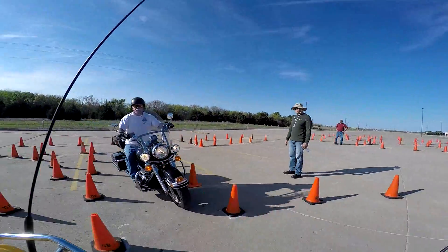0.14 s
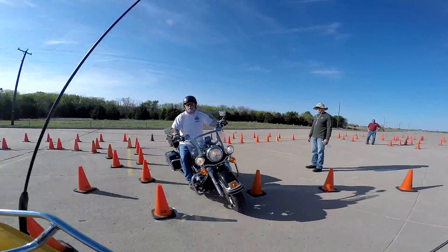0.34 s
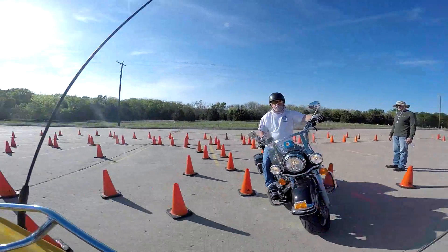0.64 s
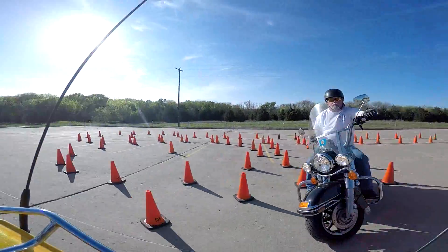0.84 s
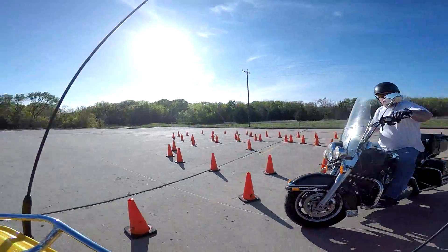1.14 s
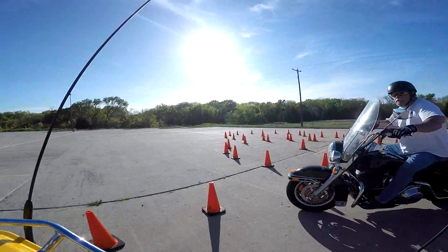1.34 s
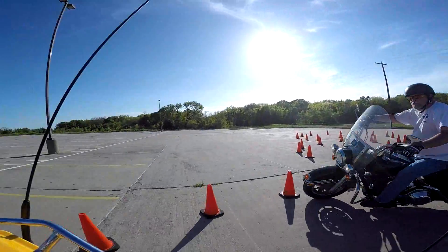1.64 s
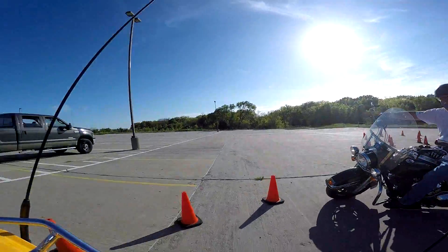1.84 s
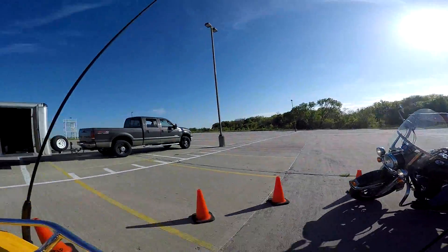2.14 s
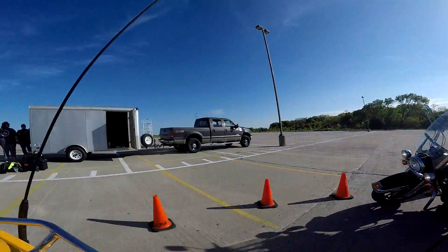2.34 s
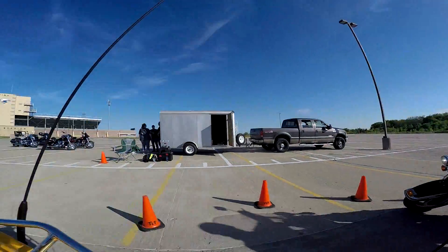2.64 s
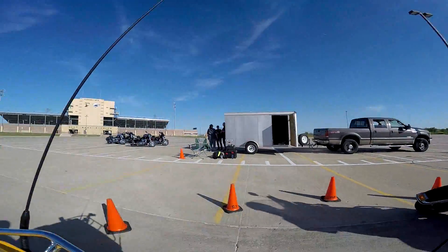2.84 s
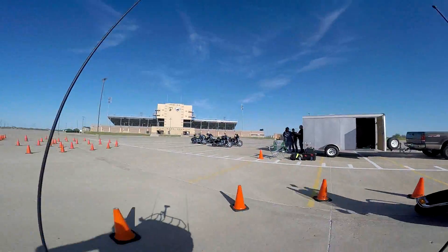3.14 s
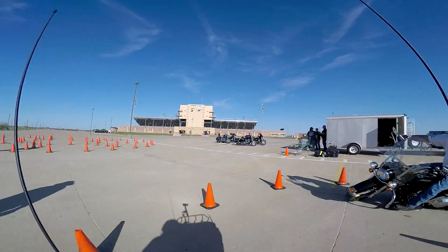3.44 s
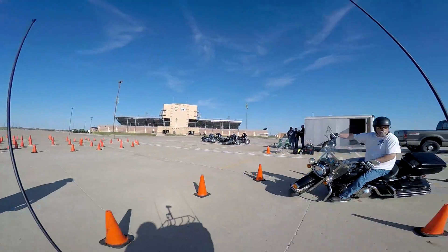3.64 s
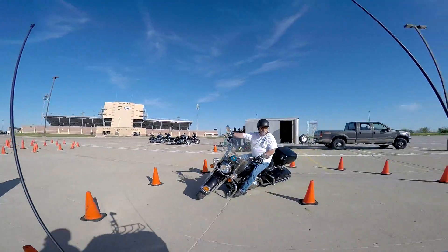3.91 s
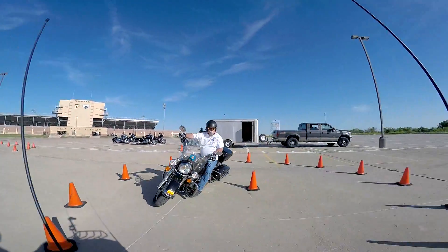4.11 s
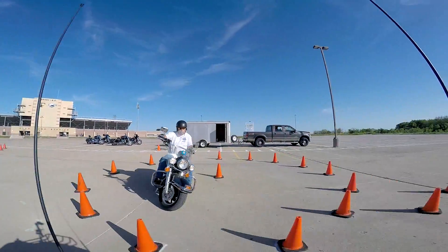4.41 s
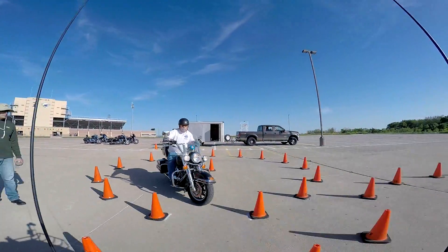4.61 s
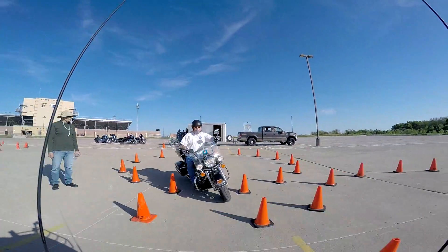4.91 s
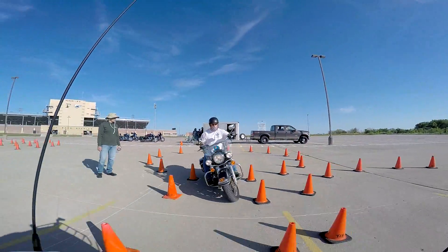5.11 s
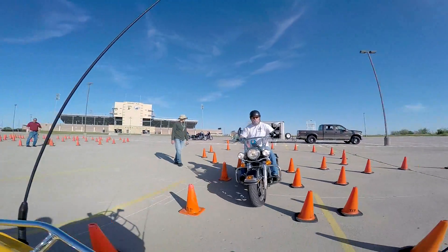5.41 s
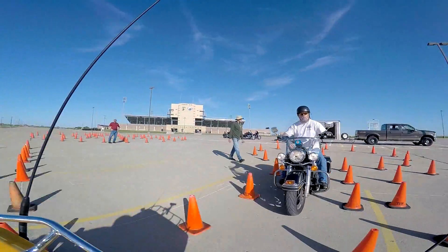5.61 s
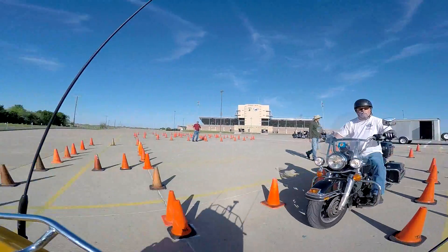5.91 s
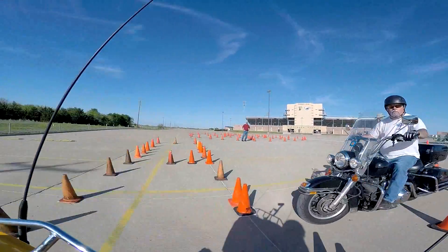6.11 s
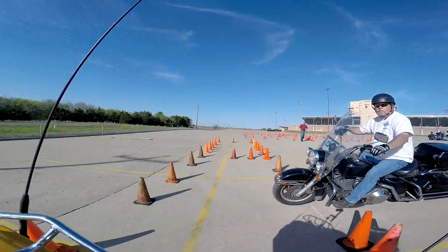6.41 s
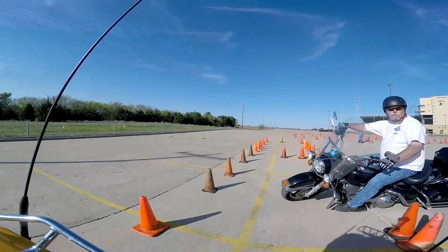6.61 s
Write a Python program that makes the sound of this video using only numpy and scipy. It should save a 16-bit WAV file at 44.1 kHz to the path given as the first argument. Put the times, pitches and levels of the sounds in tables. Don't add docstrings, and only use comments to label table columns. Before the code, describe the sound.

From the start a deep, muffled V-twin drone dominates, about sixteen to nineteen throbs a second with light valve ticks, over a closer engine's uneven bark, knocking cases and bright clatter. The drone quickens and turns throatier around 1 second, then slows and recedes by 2. The near engine climbs from 1.3, with a faint gear whine, and its throttle snaps open at 1.8 to 2.05 with raw, raspy gas bursts; a thin air hiss runs until about 2.75. It settles by 3 into slower puffing, chirping ports and dense metallic ticking as the drone returns. Rough knocks come at 3.5 and 3.9, then cluster at 4.4 to 5 as firing stumbles and a stronger wind gust buffets. After 5.3 the other engine surges again, easing gradually while both rumble on until an abrupt end at about 6.75. Open, dry outdoor lot; microphone on the near motorcycle.

```python
import sys
import numpy as np
from scipy import signal
from scipy.fft import rfft, irfft, next_fast_len
from scipy.io import wavfile
from scipy.ndimage import uniform_filter1d

SR = 44100
rng = np.random.default_rng(int(sys.argv[2]) if len(sys.argv) > 2 else 0)


def voltage_ratio(level):
    return 10 ** (np.asarray(level, float) / 20)


def materialize(psi):
    bounded = np.clip(np.atleast_2d(psi).T, -1, 1)
    quanta = np.round(bounded * 32767).astype(np.int16)
    wavfile.write(sys.argv[1], SR, quanta)


N = 297675
T = np.arange(N) / SR

# centre_s, half_length_s, level_db
GUSTS = [
    (0, .45, -34.5),
    (2.05, .7, -36),
    (3.6, .4, -35.5),
    (4.8, .45, -30.5),
    (6.45, .3, -38),
]
# freq_hz, density_db
WIND_COLOUR = [(14, -20), (28, -5), (50, 0), (90, -5), (160, -13), (280, -22), (500, -38)]
# time_s, level_db
HISS_LEVEL = [
    (1.8, -83),
    (1.86, -44.5),
    (2.4, -45.5),
    (2.72, -42),
    (2.78, -61),
    (2.85, -84),
]
# freq_hz, density_db
HISS_COLOUR = [(800, -24), (2500, -7), (6000, -3), (14000, 4.5), (16000, -5)]

# time_s, rate_cycles_per_s, level_db
OTHER_ENGINE = [(0.0, 16.154, -14.2), (0.425, 16.639, -14.3), (0.825, 18.665, -13.2),
                (1.225, 19.296, -14.6), (1.575, 15.305, -15.8), (1.875, 13.405, -17.9),
                (2.325, 12.419, -18.8), (3.325, 12.446, -17.4), (3.525, 12.912, -15.0),
                (4.25, 14.482, -16.0), (4.375, 15.975, -16.0), (4.475, 16.512, -17.4), (5.0, 12.495, -16.3),
                (5.35, 17.571, -13.5), (5.5, 18.747, -14.0), (5.875, 17.91, -14.4), (6.05, 18.011, -14.0),
                (6.75, 15.654, -15.6)]
# swings_per_cycle, rise_cycles, decay_cycles, level_db, sign
OTHER_WAVE = [(5.13, .1, .25, 0, -1), (6.83, .1, .28, -9.5, -1), (12.6, .05, .2, -23, 1)]
# time_s, level_db
TICK_LEVEL = [(0, -34.5), (.6, -32), (1.2, -30.5), (1.6, -62), (3.4, -36.5), (5.1, -40), (5.45, -34),
              (6.1, -33), (6.75, -39)]
# time_s, level_db
HEADER_LEVEL = [
    (.45, -86),
    (.7, -41),
    (1, -30.5),
    (1.25, -44),
]
# time_s, near_db, other_db
SCATTER = [(0, .7, .6), (1.3, 1.2, .6), (2, 1.7, .8), (2.6, 1.2, .8), (4.2, .8, .8), (4.45, 1.6, 1.8),
           (5, 1.6, 1.8), (5.3, .7, .6), (6.75, .7, .6)]

# start_s, level_db, pitch_hz
FRAME_KNOCKS = [(1.158, -13, 355), (3.465, -11, 350), (3.916, -14, 301), (4.128, -14, 348),
                (4.867, -26, 466), (5.733, -14, 301), (4.379, -8.5, 310), (4.431, -7.5, 306),
                (4.469, -27, 346), (4.619, -12, 377), (4.994, -11.5, 400), (4.54, -14, 500),
                (5.018, -9, 348)]
# time_s, level_db
WHINE_LEVEL = [(1.25, -75), (1.33, -51), (1.55, -48), (1.62, -47), (1.78, -46), (1.85, -75)]
# start_s, level_db, pitch_hz
CASE_KNOCKS = [(0.021, -22, 452), (0.146, -20, 579), (0.182, -21, 519), (0.303, -20, 598),
               (0.329, -21, 479), (0.362, -21, 528), (0.416, -24, 530), (0.472, -24, 495),
               (0.566, -18, 576), (0.655, -22, 525), (0.734, -20, 619), (0.788, -21, 603), (0.82, -21, 549),
               (0.882, -23, 565), (0.926, -21, 560), (0.989, -21, 643), (1.136, -22, 565),
               (1.359, -21, 544), (1.419, -19, 616), (1.729, -21, 401), (1.761, -20, 700),
               (1.798, -21, 616), (1.876, -18, 460), (2.136, -26, 458), (2.501, -22, 412),
               (2.743, -19, 409), (2.888, -24, 436), (3.465, -19, 447), (3.619, -22, 633),
               (3.646, -22, 466), (3.917, -21, 557), (4.131, -20, 568), (4.334, -22, 592), (4.38, -17, 420),
               (4.432, -22, 415), (4.467, -19, 684), (4.586, -22, 608), (4.825, -22, 501),
               (4.903, -27, 476), (4.963, -24, 525), (4.995, -21, 420), (5.406, -21, 420),
               (5.481, -22, 589), (5.504, -23, 589), (5.556, -23, 525), (5.583, -20, 611),
               (5.732, -19, 576), (5.83, -20, 571), (5.878, -22, 654), (6.054, -24, 568), (6.116, -23, 557),
               (6.176, -22, 638), (6.282, -23, 627), (6.339, -22, 560), (6.518, -24, 530)]
# start_s, level_db, pitch_hz
CLANKS = [(0.0807, -29, 3000), (0.3042, -29, 3780), (0.4174, -24.5, 3230), (0.4419, -27, 3070),
          (0.5277, -29, 3740), (0.5821, -24, 3660), (0.7442, -27, 3670), (0.7981, -19.5, 3210),
          (0.851, -25, 3700), (0.9033, -24.5, 3580), (1.2775, -26, 2740), (1.8083, -22, 2800),
          (1.8492, -22, 2680), (1.8876, -19, 2570), (2.6574, -28, 4240), (2.7077, -30, 3120),
          (2.809, -27, 2940), (2.8604, -27.5, 2900), (2.8938, -22, 3400), (2.9467, -26, 3000),
          (2.9652, -30, 2910), (3.019, -24, 2880), (3.0729, -32.5, 3100), (3.1033, -35, 3250),
          (3.1258, -30, 2700), (3.234, -25, 2850), (3.2655, -30, 3100), (3.3428, -36, 2830),
          (3.3982, -29, 2960), (3.4521, -33, 3900), (3.5079, -25, 3930), (3.5618, -34, 3860),
          (3.6182, -30, 3150), (3.7269, -32, 3040), (3.9948, -36, 2980), (4.9626, -30, 3100),
          (5.0823, -28, 3340), (5.1088, -29, 3720), (5.1432, -31, 4980), (5.1696, -30, 4800),
          (5.2036, -25, 3210), (5.2614, -28, 3530), (5.2869, -32, 3300), (5.3178, -29, 2480),
          (5.4281, -28, 3950)]
# start_s, level_db, pitch_hz
MORE_CLANKS = [(.386, -31, 3130), (.552, -36, 3060), (.661, -29, 3480), (.690, -30, 3180),
               (.927, -32, 3360), (1.949, -28, 4070), (2.037, -34, 4200), (2.947, -26, 4840),
               (2.968, -30, 5600), (3.021, -33, 5500), (3.236, -28.5, 4640), (3.268, -30, 4430),
               (3.345, -36, 6350)]

# start_s, level_db, pitch_hz
PORT_NOTES = [(0.3057, -27, 1520), (0.3885, -25, 1230), (1.1358, -26, 972), (1.3259, -23, 907),
              (1.3533, -25, 1010), (1.5539, -23, 980), (1.6217, -22, 1300), (1.8068, -19, 991),
              (1.8322, -18, 926), (1.9245, -17, 1040), (1.9584, -16, 1120), (1.9964, -18, 912),
              (2.2164, -19, 1180), (2.2593, -23, 1030), (2.3835, -22, 985), (2.4244, -24, 1040),
              (2.5127, -24, 1130), (2.5596, -23, 1280), (2.6075, -24, 1120), (2.6559, -26, 1270),
              (2.7072, -21, 1480), (2.7876, -24, 1080), (2.8594, -19, 1120), (2.9113, -23, 1160),
              (2.9672, -17, 1460), (3.018, -19, 1220), (3.0714, -20, 1210), (3.2326, -24, 1450),
              (3.2864, -23, 974), (3.3423, -24, 1470), (3.3992, -23, 1070), (3.4506, -25, 1220),
              (3.5059, -25, 1240), (3.5608, -24, 1220), (3.6147, -24, 1210), (3.6701, -25, 1210),
              (3.7249, -22, 1490), (3.7788, -22, 904), (3.8327, -23, 1250), (3.8871, -21, 1190),
              (3.9404, -22, 1450), (4.1006, -23, 1230), (4.1525, -22, 1650), (4.1829, -26, 1380),
              (4.2552, -23, 1460), (4.3051, -24, 1450), (4.3555, -25, 1490), (4.3804, -22, 902),
              (4.9636, -25, 969), (5.0828, -26, 1370), (5.1432, -26, 1210), (5.2036, -26, 1240),
              (6.0881, -27, 961), (6.6757, -23, 1240), (6.7286, -25, 1030)]
# start_s, level_db
SPITS = [(0.0223, -39), (0.0468, -41), (0.0802, -35), (0.1062, -39), (0.163, -39), (0.1855, -42),
         (0.3057, -42), (0.3616, -45), (0.4204, -39), (0.4728, -38), (0.7397, -40), (0.7687, -40),
         (0.847, -40), (0.8779, -42), (0.9293, -42), (1.0326, -45), (1.0615, -40), (1.0894, -43),
         (1.1134, -43), (1.2595, -39), (1.281, -37), (1.3089, -38), (2.9153, -39), (2.9467, -36),
         (2.9672, -42), (3.019, -41), (3.0729, -40), (3.1253, -42), (3.1797, -43), (3.2345, -43),
         (3.3428, -41), (3.3742, -43), (3.3992, -41), (3.5074, -40), (3.5618, -43), (3.6177, -39),
         (3.6726, -38), (3.7264, -41), (3.8342, -41), (3.8711, -40), (3.8886, -42), (3.9953, -39),
         (4.0477, -40), (4.0991, -38), (4.4084, -42), (4.5101, -42), (4.9626, -45), (5.1437, -41),
         (5.66, -39), (5.7084, -43), (5.7568, -42), (5.7877, -41), (6.3884, -39), (6.5196, -41),
         (6.6807, -42)]
# freq_hz, density_db
SPIT_COLOUR = [(5000, -20), (7000, 0), (10000, -2), (13000, -9), (15600, -16)]
# start_s, level_db
POPS = [(1.7898, -23), (1.8078, -17), (1.85, -16), (1.8876, -18), (1.9285, -14.5), (1.96, -16)]
# freq_hz, density_db
POP_COLOUR = [(500, -22), (800, 8), (1800, -1), (3300, -11), (4500, -16), (6000, -30)]

# time_s, flow_db, valve_crack_db, pipe_facing_db
GAS = [(0, -2, 6.5, 1), (.3, -2, 4.5, -1.5), (.65, 1, 5.5, -1), (1.05, -1, 2, -2), (1.3, 2, 5.5, -2.5),
       (1.55, 5, 0, -2.5), (1.9, 2.5, 3.5, -1), (2.35, 3, 2, 1.5), (2.6, 1, 4, 2), (3.0, 0.5, 7.5, -4.5),
       (3.6, -1.5, 5, -2), (4.1, -0.5, 7, -0.5), (4.4, 1, 5.5, -3.5), (4.75, -6, 3, -2.5),
       (5.2, -0.5, 7, -2.5), (5.55, -1, 4, -3), (6.0, 0.5, 2, -1.5), (6.75, 2, 5, -1)]
# time_s, extra_gas_db
BLIP = [
    (1.78, 0),
    (1.8, 3),
    (2.03, 3),
    (2.08, 0.5),
]
# freq_hz, density_db
THROAT_COLOUR = [(250, 10), (330, 8), (420, 4.5), (500, 3), (600, 1), (750, -2.5), (900, -8.5), (1150, -39)]
MIDDLE_COLOUR = [(750, -1.5), (950, 0), (1250, -1.5), (1900, -9), (2400, -31)]
JET_COLOUR = [(1700, -1.5), (2100, 1), (3100, -1.5), (5000, -4.5), (6500, -9), (7800, -23)]
TOP_COLOUR = [(5800, -23), (7000, -0.5), (9000, -5.5), (12000, -12), (15500, -19.5)]
# start_s, length_s, chirp_db
WHISTLES = [(1.3, .9, 4.5), (2.196, 0.16, 12), (2.54, 1.9, 13), (2.862, 0.2, 17), (3.24, 0.13, 14.5),
            (3.717, .22, 14.5), (4.25, .1, 13.5), (5.144, 0.08, 8.5), (5.8, 0.12, 10.5), (6.68, .06, 7)]
CHIRP_HZ = (1200, 1465, 2340, 2910)

# time_s, rate_cycles_per_s, level_db
NEAR_ENGINE = [(0.0, 17.526, -27.0), (0.25, 17.575, -25.8), (0.85, 18.838, -26.7), (1.375, 21.081, -21.1),
               (1.625, 23.615, -21.1), (1.775, 23.857, -19.2), (2.025, 27.98, -18.8),
               (2.325, 24.824, -20.8), (2.6, 20.501, -20.3), (2.95, 18.876, -20.4), (3.425, 18.161, -21.8),
               (3.85, 18.526, -22.4), (4.575, 20.25, -24.3), (4.925, 17.307, -23), (5.1, 16.288, -25.3),
               (5.7, 20.401, -24.4), (5.95, 21.126, -23.1), (6.75, 18.651, -22.7)]
# swings_per_cycle, decay_cycles, level_db, sign
NEAR_WAVE = [(8.9, .14, 0, 1), (3.8, .22, 4.7, -1), (12.1, .24, -10, 1)]
# pitch_hz, width_hz, level_db
NEAR_PIPE = [(174.2, 9.4, -13.5), (245.6, 7.6, -23.5), (352.2, 27, -22)]
# time_s, valve_rise_cycles, bite_db, bite_swings_per_cycle, front_early_cycles, rear_early_cycles
LOAD = [(0, .01, -20.5, 22, 0.0033, -0.0067), (1.35, 0.0088, -16, 14.5, 0.014, 0.017),
        (1.7, 0.012, -8, 15.6, 0.012, 0.024), (2.0, 0.022, -12.5, 14.2, 0.016, 0.029),
        (2.55, 0.031, -12, 15.4, 0.0082, .02), (2.75, 0.0033, -16, 20, 0.0012, -0.001),
        (4.3, 0.0045, -24, 19, 0.0015, -0.001), (5.0, 0.0091, -25, 18.8, .004, 0.0017),
        (5.7, .018, -22, 15.2, 0.0076, 0.0064), (6.75, 0.011, -16, 18, 0.0078, 0.0053)]


def curves(table):
    time_s, *columns = np.transpose(table)
    return [np.interp(T, time_s, column) for column in columns]


def unit(x):
    return x / np.sqrt(np.mean(x ** 2))


def noise(colour):
    hz, db = np.transpose(colour)
    size = next_fast_len(N)
    log_hz = np.log(np.maximum(np.arange(size // 2 + 1), 1) * SR / size)
    gain = voltage_ratio(np.interp(log_hz, np.log(hz), db, left=-90, right=-90))
    return unit(irfft(rfft(rng.standard_normal(size)) * gain, size)[:N])


def ring(x, hz, width_hz):
    return signal.lfilter(*signal.iirpeak(hz, hz / width_hz, fs=SR), x)


def walk(rate_hz):
    hold = int(SR / rate_hz)
    steps = np.repeat(rng.standard_normal(N // hold + 1), hold)
    return 1.2 * uniform_filter1d(steps, hold)[:N]


def strokes(rate_hz, places, slip_cycles=.002):
    crank = np.cumsum(rate_hz) / SR
    for place in places:
        chance = np.clip(rng.standard_normal((400, 4)), -1.6, 1.6)
        turn = np.floor(crank - place).astype(int) + 1
        late = slip_cycles * np.abs(chance[turn, 0])
        yield np.maximum(crank - place - turn + 1 - late, 0), chance[turn, 1:].T


def swell(angle, rise, decay):
    return (1 - np.exp(-angle / rise)) * np.exp(-angle / decay) * np.minimum(10 * (1 - angle), 1)


def blow(angle, waves):
    return sum(sign * voltage_ratio(db) * swell(angle, rise, decay) * np.sin(2 * np.pi * swings * angle)
               for swings, rise, decay, db, sign in waves)


def place_bursts(starts_s, bursts):
    out = np.zeros(N + SR)
    for start_s, burst in zip(starts_s, bursts):
        start = int(start_s * SR)
        out[start:start + len(burst)] += burst
    return out[:N]


def wind():
    calm_db = -50
    gusts = voltage_ratio(calm_db) + sum(voltage_ratio(db) * np.exp(-((T - s) / half_s) ** 2) for s, half_s, db in GUSTS)
    return gusts * voltage_ratio(7.5 + 2.5 * walk(12)) * noise(WIND_COLOUR)


def air_hiss():
    return voltage_ratio(curves(HISS_LEVEL)[0] + 0.62 * walk(25.1)) * noise(HISS_COLOUR)


def other_bike():
    rate_hz, level_db = curves(OTHER_ENGINE)
    scatter_db = curves(SCATTER)[1]
    drone = sum(voltage_ratio(scatter_db * c[0]) * blow(angle, OTHER_WAVE)
                for angle, c in strokes(rate_hz, (.422, .991)))
    tick_db = (1.5, 1.5, -2, 1.5)
    ticks = sum(voltage_ratio(db + 1.2 * c[0]) * swell(angle, 0.0015, 0.0029)
                for db, (angle, c) in zip(tick_db, strokes(rate_hz, (.12, .37, .55, .95))))
    cases = ring(ring(ticks, 582, 71) + 0.45 * ring(ticks, 653, 90), 570, 330)
    header = voltage_ratio(curves(HEADER_LEVEL)[0]) * unit(ring(ring(drone, 260, 70), 260, 70))
    return header + voltage_ratio(level_db + 0.83) * unit(drone) + voltage_ratio(curves(TICK_LEVEL)[0] - .2) * unit(cases)


def frame():
    whine_hz = 3080 * (1 + 0.02 * walk(200))
    out = voltage_ratio(curves(WHINE_LEVEL)[0] + 4.2 * walk(90)) * np.sin(2 * np.pi * np.cumsum(whine_hz) / SR)
    rattle = noise(THROAT_COLOUR)
    for start_s, db, hz in FRAME_KNOCKS:
        age_s = np.maximum(T - start_s, 0)
        thud = np.exp(-age_s / 0.0044) * np.sin(2 * np.pi * hz * age_s)
        rough = swell(np.minimum(age_s, 1), .0015, .02) * rattle
        out += voltage_ratio(db - 8.5) * (.5 * thud + .75 * rough)
    return out


def sagging_rings(hits, gain_db, rise_s, decay_s, sag, noise_share):
    age_s = np.arange(SR // 20) / SR
    shape = (1 - np.exp(-age_s / rise_s)) * np.exp(-age_s / decay_s)
    shape = shape / shape.max()
    bursts = []
    for _, db, hz in hits:
        hiss = rng.standard_normal(len(age_s))
        fray = unit(ring(ring(hiss, 1.1 * hz, .7 * hz), 1.1 * hz, .7 * hz))
        note = np.sin(2 * np.pi * hz * (age_s - sag * age_s ** 2 / (2 * decay_s)))
        bursts.append(voltage_ratio(db + gain_db) * shape * (note + noise_share * fray))
    return place_bursts([hit[0] for hit in hits], bursts)


def case_knocks():
    return sagging_rings(CASE_KNOCKS, gain_db=-4.5, rise_s=.001, decay_s=.006, sag=.04, noise_share=.25)


def valves():
    age_s = np.arange(SR // 20) / SR
    shape = (1 - np.exp(-age_s / 0.00075)) * np.exp(-age_s / 0.0035)
    click = noise([(1500, -20), (2500, -5), (6000, -1), (9000, -20)])
    partials = ((.97, -1), (1.15, -5.5), (1.6, -9))  # pitch_ratio, level_db
    hits = list(CLANKS) + list(MORE_CLANKS)
    bursts = []
    for start_s, db, hz in hits:
        notes = voltage_ratio(1) * click[int(start_s * SR):][:len(age_s)] * np.exp(-age_s / 0.0017)
        for ratio, part_db in partials:
            detune, phase = rng.random(2)
            part_hz = hz * ratio * (1 + 0.072 * detune)
            notes = notes + voltage_ratio(part_db) * np.sin(2 * np.pi * (part_hz * age_s + phase))
        bursts.append(voltage_ratio(db - 4.5) * shape * notes)
    return place_bursts([hit[0] for hit in hits], bursts)


def squeak():
    start_s, length_s, from_hz, to_hz, level_db = 1.243, .022, 13500, 14000, -52
    part = np.clip((T - start_s) / length_s, 0, 1)
    pitch_hz = from_hz + (to_hz - from_hz) * part
    return voltage_ratio(level_db) * np.sin(np.pi * part) ** 2 * np.sin(2 * np.pi * np.cumsum(pitch_hz) / SR)


def spits():
    shape = swell(np.arange(SR // 20) / SR, .0015, .003)
    bursts = [voltage_ratio(db - 6) * shape for _, db in SPITS]
    return place_bursts([spit[0] for spit in SPITS], bursts) * noise(SPIT_COLOUR)


def port_notes():
    return sagging_rings(PORT_NOTES, gain_db=-6.5, rise_s=.0025, decay_s=.0045, sag=.04, noise_share=.3)


def pops():
    bursts = sum(voltage_ratio(db - 3.5) * swell(np.clip(T - s, 0, 1), .0017, .0069) for s, db in POPS)
    return bursts * noise(POP_COLOUR)


def whistle_db():
    rest_db, ease_s = 3, 0.095
    turns = [db * np.clip(np.minimum(T - s, s + length_s - T) / ease_s + 1, 0, 1)
             for s, length_s, db in WHISTLES]
    return np.maximum(np.max(turns, axis=0), rest_db)


def port_chirp(rear, chance):
    low, high, over, top = (
        np.sin(2 * np.pi * np.cumsum(hz * (1 + .016 * chance[2] + .05 * walk(900))) / SR) for hz in CHIRP_HZ)
    late = np.maximum(rear - .02, 0)
    notes = voltage_ratio(-2.5 * chance[0]) * low + voltage_ratio(2.0 * chance[0]) * high
    notes += voltage_ratio(2.5 * chance[1] - 10) * over + voltage_ratio(-2.5 * chance[1] - 11) * top
    return late / 0.048 * np.exp(-late / 0.043) * notes


def near_gas():
    rate_hz, level_db = curves(NEAR_ENGINE)
    flow_db, crack_db, facing_db = curves(GAS)
    blip_db = curves(BLIP)[0]
    throat_db = -27 + .7 * flow_db + 2.5 * blip_db - .19 * facing_db
    middle_db = -43.5 + .8 * flow_db + 2.6 * blip_db + .011 * facing_db
    jet_db = -45.5 + .95 * flow_db + 1.16 * blip_db + .12 * facing_db
    top_db = -54.5 + 1.05 * flow_db + 1.1 * blip_db + 1.23 * facing_db
    (front, a), (rear, b) = strokes(rate_hz, (.33, .725))
    crack = np.maximum(voltage_ratio(crack_db) - .9, 0)

    def puffs(front_size, rear_size, decay, spread_db, order, slow=1):
        front_puff = front_size * voltage_ratio(spread_db * a[order]) * swell(front, .025 * slow, decay)
        rear_puff = rear_size * voltage_ratio(spread_db * b[order]) * swell(rear, .035 * slow, 1.3 * decay)
        return 1 + front_puff + rear_puff

    throat_db = throat_db + 0.29 * (level_db + 23.5) - 7.2
    gas = voltage_ratio(throat_db) * puffs(1.7, 0.8, 0.05, 1.8, order=0) * noise(THROAT_COLOUR)
    gas += voltage_ratio(middle_db - 1.43) * puffs(3.1, 1.8, 0.13, 3.0, order=1) * noise(MIDDLE_COLOUR)
    crackle_db = 0.97 * np.maximum(blip_db, 0) * walk(400)
    jet_puffs = puffs(1.04 * crack, 1.7 * crack, 0.076, 4.4, order=2)
    gas += voltage_ratio(jet_db + crackle_db + 1.5) * jet_puffs * noise(JET_COLOUR)
    gas += voltage_ratio(top_db - .5) * puffs(5.5 * crack, 5 * crack, .05, 4, order=0, slow=8) * noise(TOP_COLOUR)
    chirp_size = np.maximum(voltage_ratio(whistle_db()) - 1.4, 0)
    gas += voltage_ratio(middle_db + 8.0 + 0.7 * b[1]) * chirp_size * port_chirp(rear, b)
    return gas


def near_exhaust():
    rate_hz, level_db = curves(NEAR_ENGINE)
    scatter_db = curves(SCATTER)[0]
    rise, bite_db, bite_swings, *early = curves(LOAD)
    rise = np.maximum(rise, .002)
    waves = [(swings, rise if sign > 0 else .05, decay, db, sign) for swings, decay, db, sign in NEAR_WAVE]
    waves.append((bite_swings, rise, .2, bite_db, 1))
    (front, a), (rear, b) = strokes(rate_hz, np.array((.345, .773))[:, None] - early)
    bark = voltage_ratio(scatter_db * a[0]) * blow(front, waves) + voltage_ratio(scatter_db * b[0] - 1.5) * blow(rear, waves)
    bark += blow((rear - 0.2424) % 1, [(8.6, .012, 0.072, -12.5, 1)])
    kick = voltage_ratio(.8 * a[1]) * swell(front, .002, .006) + voltage_ratio(.8 * b[1] - 2) * swell(rear, .002, .006)
    pipe = sum(voltage_ratio(db) * unit(ring(kick, hz, width_hz)) for hz, width_hz, db in NEAR_PIPE)
    muffler = signal.butter(2, 900, fs=SR, output="sos")
    sharp = signal.sosfilt(muffler, unit(bark) + pipe)
    dull = signal.sosfiltfilt(signal.butter(5, 430, fs=SR, output="sos"), sharp)
    dull_share = .85 * np.clip((rise - .005) / .007, 0, 1)
    return voltage_ratio(level_db + 5.0) * (sharp + dull_share * (dull - sharp))


def scene():
    air = wind() + air_hiss()
    metal = frame() + case_knocks() + valves() + squeak()
    gas = spits() + port_notes() + pops() + near_gas()
    return (air + other_bike() + metal + gas + near_exhaust())[None]


def roll_off(x):
    return signal.sosfilt(signal.butter(12, 15670, fs=SR, output="sos"), x)


def record(dry):
    x = signal.sosfilt(signal.butter(1, 8, "high", fs=SR, output="sos"), dry)
    rounded = np.tanh(.75 * x) / .75
    fade = np.minimum((T[-1] - T) / .004, 1)
    return roll_off(rounded * fade)


dry = scene()
out = record(dry)
materialize(out)
```